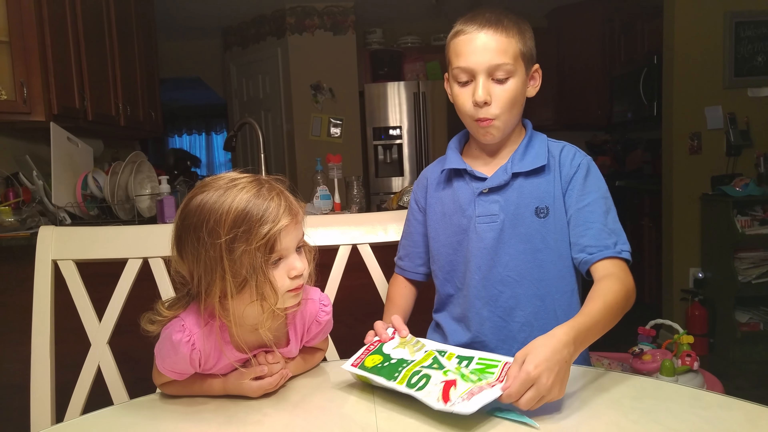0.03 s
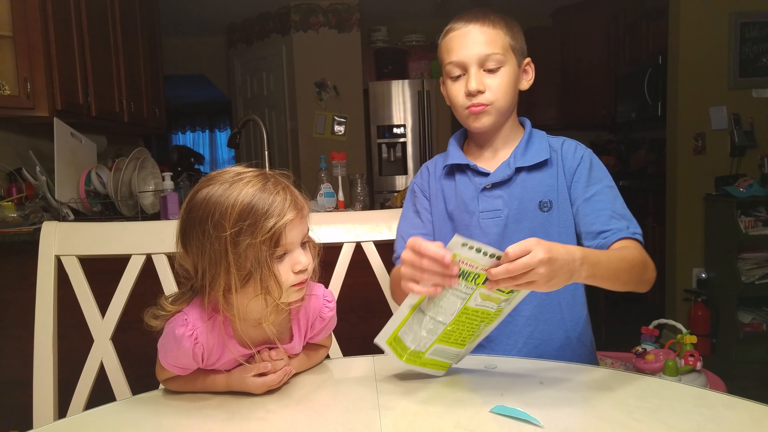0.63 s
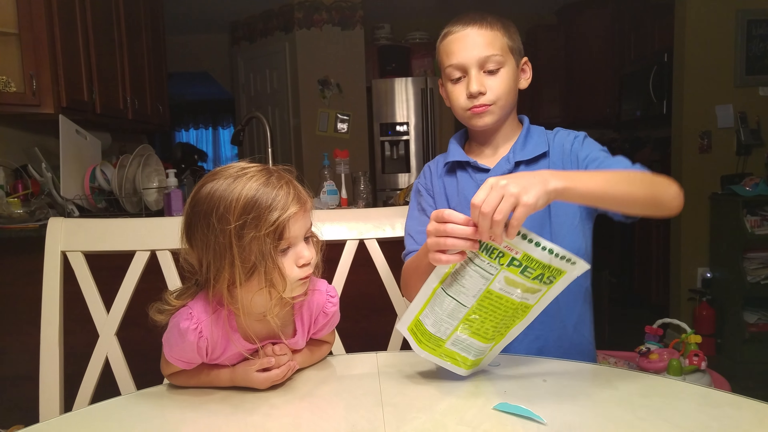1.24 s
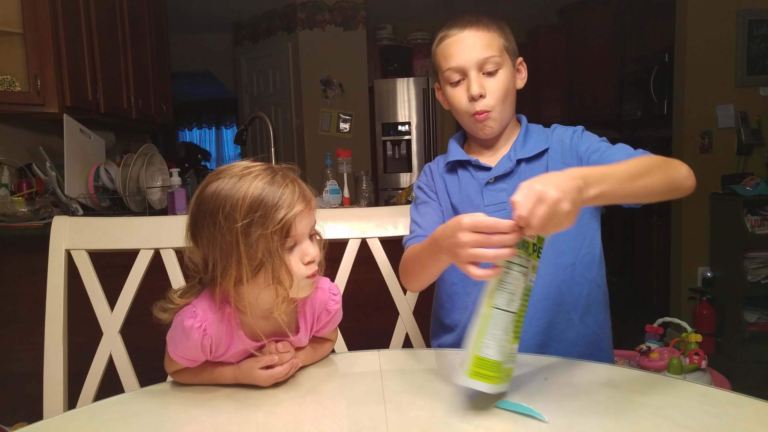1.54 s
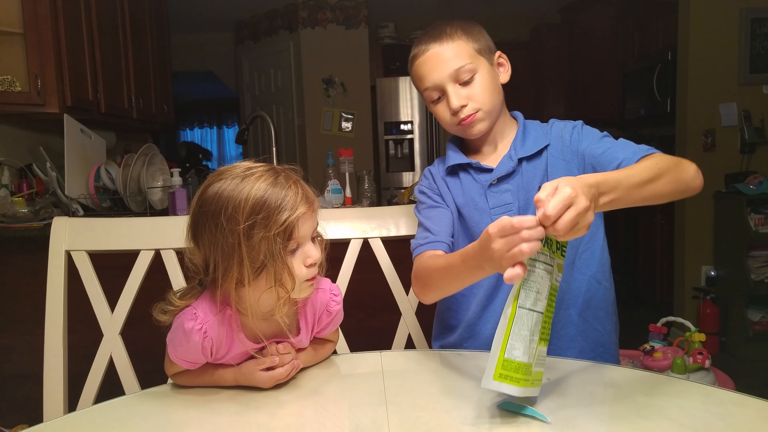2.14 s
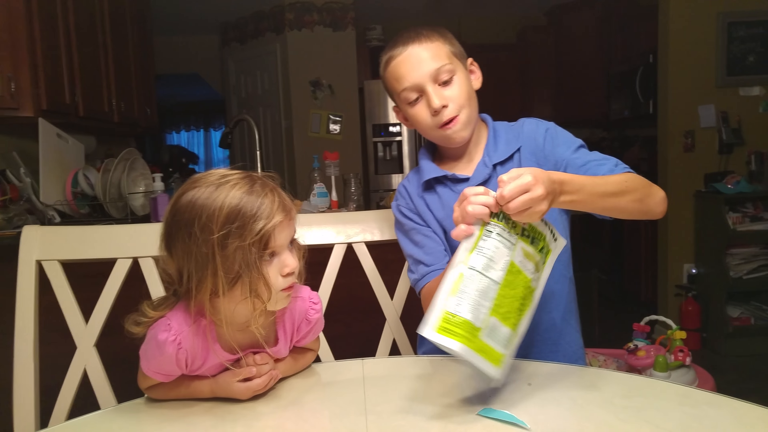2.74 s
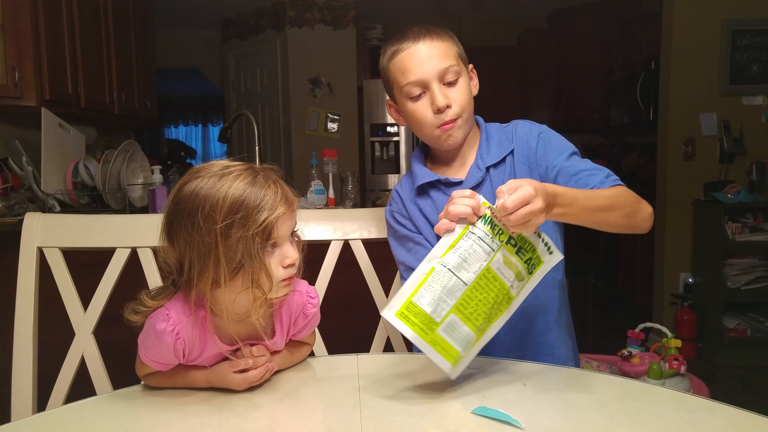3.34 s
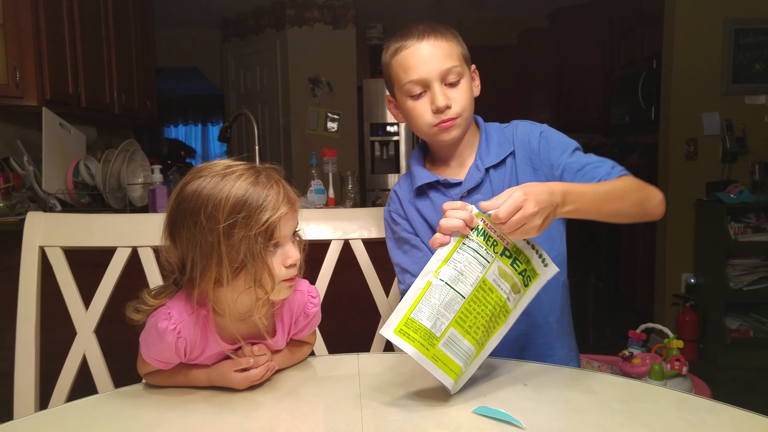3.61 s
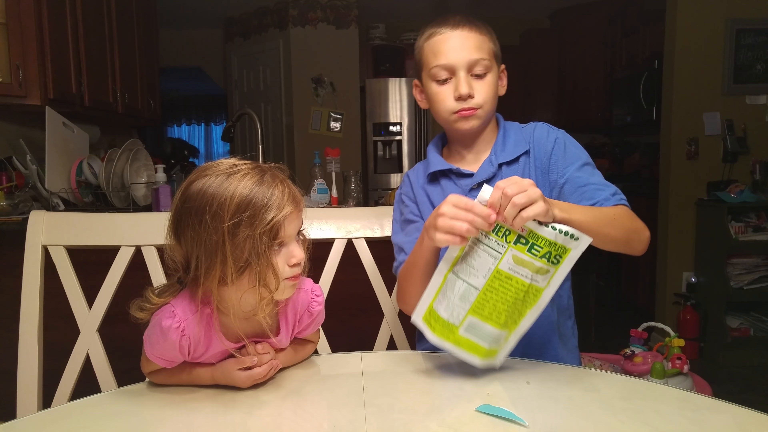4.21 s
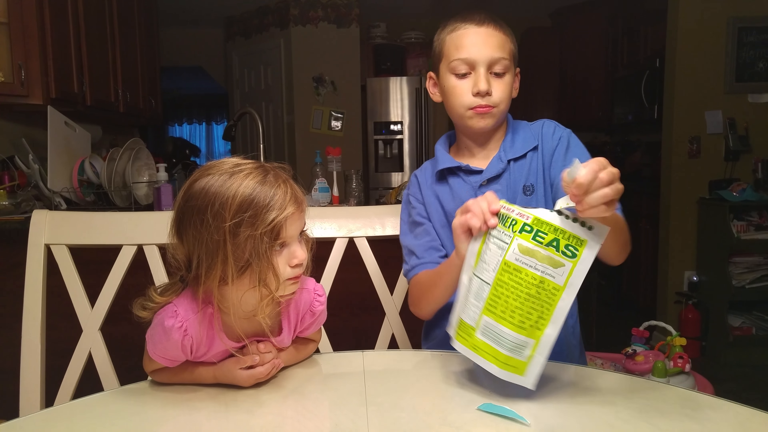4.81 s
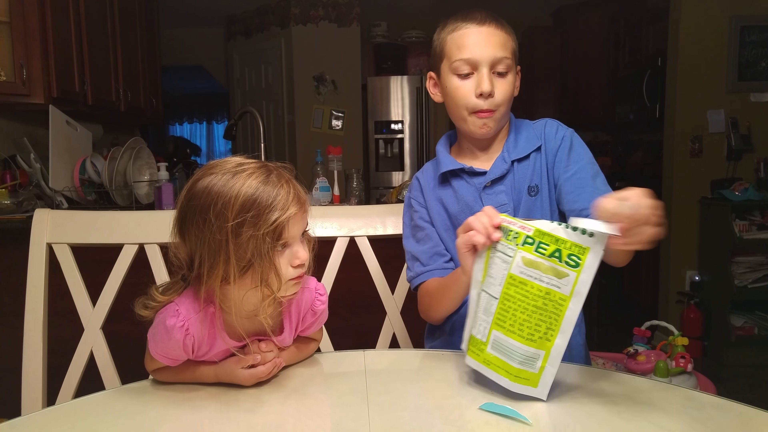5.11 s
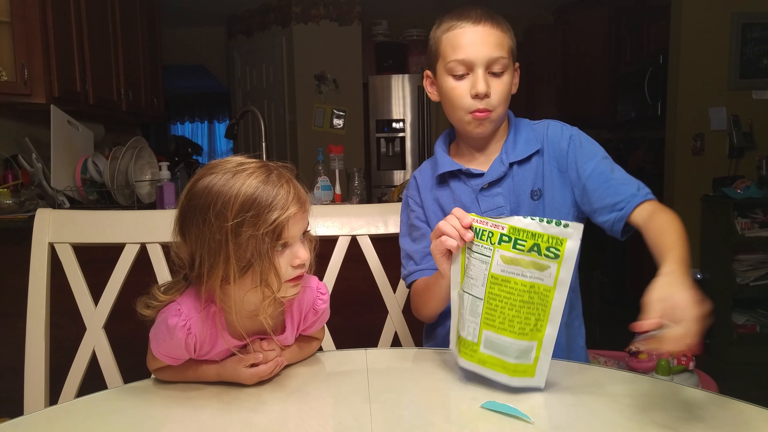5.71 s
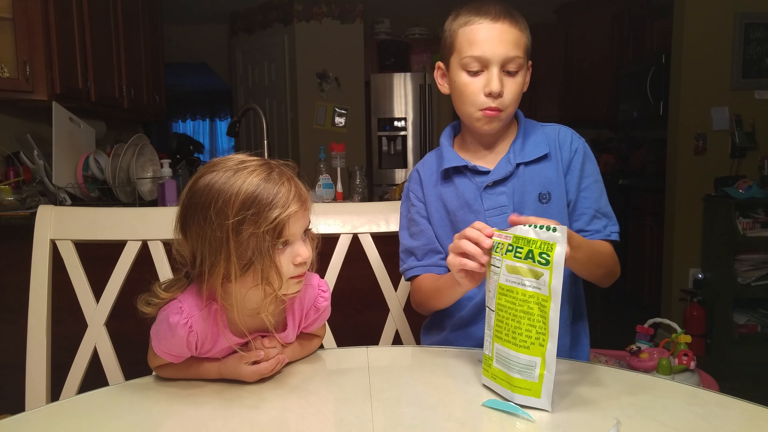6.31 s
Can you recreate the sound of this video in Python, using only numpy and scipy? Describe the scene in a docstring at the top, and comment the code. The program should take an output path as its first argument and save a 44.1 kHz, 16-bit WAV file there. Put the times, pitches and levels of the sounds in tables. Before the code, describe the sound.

A stiff plastic snack pouch crackles in irregular bursts and tears open with a loud snap in a quiet kitchen.

```python
"""Tearing open a snack pouch.

A stiff plastic pouch is lifted off a kitchen table, worried at its seal and torn open. The film buckles
in sharp snaps, each trailing tiny creases, and rustles under every pull. Broad panels pop through and
the table thuds. Table top and kitchen reflect it all, over faint air noise and an appliance hum."""
import sys
import numpy as np
from scipy import signal
from scipy.fft import rfft, irfft
from scipy.io import wavfile
from scipy.ndimage import uniform_filter1d

SR = 44100
rng = np.random.default_rng(int(sys.argv[2]) if len(sys.argv) > 2 else 0)


def generate_wav(sig):
    """Save sig (samples, or channels by samples) to the path in sys.argv[1] as 16-bit PCM at SR."""
    pcm = np.round(np.clip(np.atleast_2d(sig).T, -1, 1) * 32767).astype(np.int16)
    wavfile.write(sys.argv[1], SR, pcm)


N = 288855

# film buckles: start_s, level_db, pitch_hz, bright_db
BUCKLES = [(0.028, -52.5, 1596, -7.5), (0.171, -47, 4250, -5), (0.189, -39, 3750, -19.5),
           (0.325, -42, 1770, -29), (0.548, -41, 1430, -5), (0.646, -52, 3160, -4.5),
           (0.703, -55.5, 3120, -2.5), (0.72, -54, 2920, 6), (0.905, -58.5, 2003, -19),
           (0.924, -44.5, 4867, 0), (1.56, -64.5, 1008, -4.5), (1.718, -48.5, 2725, 0),
           (1.868, -50, 2800, 5), (1.878, -48, 3200, -5.5), (2.035, -54.5, 5070, 0),
           (2.136, -57.5, 2035, -16.5), (2.471, -53.5, 3680, -1), (2.505, -49.5, 2330, -1.5),
           (2.674, -54.5, 2045, -10), (2.866, -57.5, 1437, 3.5), (3.23, -48, 2320, 4.5),
           (3.25, -44, 2100, -10), (3.283, -28.5, 2154, -4.5), (3.361, -33, 2500, 2),
           (3.699, -52.5, 1490, -6.5), (3.858, -59, 1600, -10), (4.011, -55, 2310, -4),
           (4.11, -52, 2180, 1), (4.137, -48.5, 2210, -8), (4.154, -37, 2250, 0), (4.292, -45.5, 2530, -7),
           (4.351, -34, 3480, -4.5), (4.373, -51, 2030, -33), (4.482, -54.5, 2510, 7),
           (4.487, -44, 2850, 5), (4.502, -36.5, 2020, -7), (4.611, -48.5, 4020, 3.5),
           (4.822, -40, 1820, 5), (4.832, -53, 1790, 8.5), (4.864, -31, 2270, 0.5), (4.906, -31, 1870, -4),
           (4.961, -44, 3260, 3), (4.97, -44, 3270, -10), (5.016, -40.5, 2044, -8), (5.107, -47, 2030, -12),
           (5.123, -45.5, 2880, -11.5), (5.243, -47.5, 2330, 7.5), (5.404, -47, 2480, 5),
           (5.516, -47, 2500, 2.5), (5.568, -47, 5070, -3), (5.681, -50.5, 1188, -5.5),
           (6.1, -50.5, 2400, 10), (6.208, -56, 1500, -9), (6.365, -57.5, 2550, -1),
           (6.435, -58.5, 1010, -21)]
# pulls that crease, slide or tear the film: start_s, length_s, level_db, body_db, bright_db
PULLS = [(0.17, 0.052, -40, -18, 1.5), (0.183, 0.028, -22.5, -21, 1.5), (0.216, .07, -42.5, -13.5, -5),
         (0.702, .11, -46.5, -13, -4), (0.919, 0.071, -47, -8, -9), (1.243, 0.085, -55, -16, -3.5),
         (2.253, 0.051, -61, -17.5, -10), (3.228, .035, -39.5, -13.5, -3), (4.272, .035, -50, -28, -8),
         (4.486, .06, -43.5, -14.5, -14), (4.775, 0.053, -51, -11.5, 7.5), (4.829, 0.036, -41, -19, 6.5),
         (4.865, .125, -35.5, -16.5, -1.5), (4.968, 0.11, -48, -18, 5), (5.239, 0.084, -41.5, -10.5, 1.5),
         (5.323, 0.11, -47, -10, -3), (5.528, 0.072, -48.5, -12, -14)]
# creasing under the fingers: time_s, level_db
FINGER_ENVELOPE = [(0, -56), (.45, -58), (1.1, -83), (1.2, -58.5), (1.4, -81.5), (2.8, -71.5),
                   (3.15, -80.5), (3.62, -62.5), (3.8, -68.5), (3.97, -56.5), (4.07, -65.5), (4.7, -69),
                   (5.7, -70.5), (5.87, -58.5), (6.02, -69), (6.5, -58)]
# film colour at the microphone: freq_hz, gain_db
FILM_EQ = [(100, 8), (330, 9.5), (500, 6), (700, 3.5), (1100, -1), (2300, 2), (3000, 3.5), (4200, 11.5),
           (6000, 7.5), (7900, 9.5), (9200, -2), (12000, -10), (15800, -7.5)]
# broad panels popping through: start_s, level_db, pitch_hz
PANEL_POPS = [(0.027, -32, 1610), (.172, -19.5, 1181), (.459, -37, 1510), (.948, -20.5, 2000),
              (.98, -36.5, 860), (1.72, -33, 2530), (2.136, -29, 2120), (2.47, -35.5, 1000),
              (2.507, -30, 965), (2.864, -46, 660), (3.284, -17, 1800), (3.607, -39.5, 2327),
              (3.858, -33.5, 2040), (3.995, -39.5, 2150), (4.093, -29, 1990), (4.621, -31.5, 1020),
              (4.9081, -3.5, 2000), (5.124, -38, 680), (5.8, -38, 2970), (5.881, -32.5, 2010),
              (6.207, -38.5, 810), (6.433, -31.5, 600), (6.459, -40.5, 900)]
# bumps against the table: start_s, level_db
TABLE_BUMPS = [(1.561, -52.5), (2.332, -40), (2.384, -53.5), (2.51, -53.5)]
# table modes: freq_hz, gain_db, t60_s
TABLE_MODES = [(72.4, 0.5, .16), (131, 2.5, .22), (211.7, 2.5, 0.075)]
# echoes off near surfaces: delay_s, gain_db
NEAR_ECHOES = [(.0005, -7), (.0017, -11), (.0075, -13), (.0093, -13), (.0106, -9), (.0120, -14),
               (.0228, -15)]
# kitchen decay: freq_hz, t60_s
ROOM_DECAY = [(150, .42), (500, .44), (1200, .45), (2500, .43), (5000, .40), (8000, .38), (15000, .32)]
# left-right likeness of diffuse sound: freq_hz, correlation
COHERENCE = [(100, .99), (330, .96), (700, .6), (1300, .15), (3000, 0), (15000, 0)]
# stereo tilt: freq_hz, left_minus_right_db
BALANCE = [(250, -.3), (600, -1.8), (1100, -3.8), (2200, -4.4), (4000, -.8), (8000, -2), (13000, -1)]
# still-room noise spectrum: freq_hz, relative_density_db
AIR_SPECTRUM = [(20, -24.5), (32, -11), (50, -7), (100, 8), (160, -4), (310, -9.5), (500, -17),
                (1000, -15.5), (2000, -17), (4000, -22), (8000, -18), (10000, -25), (16000, -34.5)]

MID_SNAP_DB = -45
BAND_LIMIT_HZ = 16150


def snaps(crack_s=.0013, ring_cycles=1.4, ring_db=-6):
    """Each buckle is a click that scatters through the film; the freed panel rings briefly."""
    out, t = np.zeros(N), np.arange(2048) / SR
    for start_s, level_db, pitch_hz, bright_db in BUCKLES:
        softness_db = MID_SNAP_DB - level_db  # soft folds are slower and hollower
        decay_s = crack_s * amp(.43 * softness_db)
        body_db = -25 + .89 * softness_db
        crack = scatter(rng.standard_normal(2 * len(t)), decay_s)
        mode = np.cos(2 * np.pi * pitch_hz * t) * np.exp(-t * pitch_hz / ring_cycles)
        ring = signal.fftconvolve(crack, mode)[:len(t)]
        panel = unit(crack) + amp(ring_db) * unit(ring)
        panel = band(panel, .31 * pitch_hz, BAND_LIMIT_HZ, order=1)  # radiates little far below pitch
        add(out, start_s, amp(level_db) * pouch(crack, panel, body_db, bright_db, top_hz=12500))
    return out


def rustles(attack_s=.001, release_s=.0035, sag_db=6.5):
    """Each pull sets off a dense run of creases that bites fast and eases as the film gives."""
    out = np.zeros(N)
    for start_s, length_s, level_db, body_db, bright_db in PULLS:
        t = np.arange(max(round(length_s * SR), 512)) / SR
        crack, panel = creasing(len(t), base_per_s=380)
        run = pouch(crack, panel, body_db, bright_db, top_hz=17000)
        edges = np.minimum(t / attack_s, 1) * np.minimum((t[-1] - t) / release_s, 1)
        add(out, start_s, run * edges * amp(level_db - sag_db * t / t[-1]))
    return out


def settling(trail_db=-46, trail_t60_s=.09, rub_db=-5):
    """Sparse creases: some under the rubbing fingers, plus a dying flurry after each snap."""
    t, kicks = np.arange(N) / SR, np.zeros(N)
    for start_s, level_db, _, _ in BUCKLES:
        add(kicks, start_s, amp([trail_db + .75 * (level_db - MID_SNAP_DB)]))
    trail_gain = signal.lfilter([1], [1, -amp(-60 / (trail_t60_s * SR))], kicks + 1e-12)
    finger_gain = amp(np.interp(t, *np.transpose(FINGER_ENVELOPE)))
    crack, panel = creasing(N, base_per_s=260)
    handling = pouch(crack, panel, body_db=-12, bright_db=-8, top_hz=15000)
    rub = amp(rub_db) * unit(band(crack, 380, 800))
    flurry = pouch(crack, panel, body_db=-25, bright_db=-3, top_hz=15000)
    return finger_gain * (handling + rub) + trail_gain * flurry


def creasing(n, base_per_s, facet_db=-2, spread_db=4.5, hiss_gain=.22):
    """Clumps of tiny unequal creases over the hiss of sliding film; each rings a small facet."""
    span = max(n, SR)
    chance, size_draw, facet_draw = rng.random((3, span))[:, :n]
    slip = unit(uniform_filter1d(rng.standard_normal(span), 300))[:n]  # grip holds and gives
    rate_per_s = base_per_s * amp(5 * slip)
    sizes = amp(spread_db * np.minimum(-np.log(size_draw + 1e-9), 3))
    creases = sizes * (chance < rate_per_s / SR) * rng.choice([-1, 1], span)[:n]
    crack = unit(creases) + hiss_gain * rng.standard_normal(span)[:n]
    facets_hz = np.geomspace(900, 3600, num=8)
    facet = np.floor(facet_draw * len(facets_hz))
    rings = sum(band(creases * (facet == k), hz / 1.15, hz * 1.15, order=1)
                for k, hz in enumerate(facets_hz))
    return crack, unit(crack) + amp(facet_db) * unit(rings)


def pouch(crack, panel, body_db, bright_db, top_hz):
    """A fold radiates three ways: enclosed air, flexing panel, sharp crease."""
    body = unit(band(crack, 140, 330))
    middle = unit(band(panel, 643, 2880))
    top = unit(band(crack, 5600, top_hz))
    return amp(body_db) * body + middle + amp(bright_db) * top


def pops(t60_cycles=15):
    """A broad panel pops through and rings in one hollow mode."""
    out = np.zeros(N)
    for start_s, level_db, pitch_hz in PANEL_POPS:
        add(out, start_s, knock(level_db, pitch_hz, t60_cycles / pitch_hz))
    return out


def thuds():
    """Each bump excites the table's low modes."""
    out = np.zeros(N)
    for start_s, level_db in TABLE_BUMPS:
        modes = [knock(level_db + gain_db, hz, t60_s) for hz, gain_db, t60_s in TABLE_MODES]
        add(out, start_s, sum(modes))
    return out


def knock(level_db, hz, t60_s):
    """One damped mode with a soft onset of about a cycle."""
    t = np.arange(SR // 2) / SR
    return amp(level_db - 60 * t / t60_s) * (1 - np.exp(-t * hz)) * np.sin(2 * np.pi * hz * t)


def moving_paths(x, count=3, cycle_hz=2.3):
    """The pouch keeps moving: its room paths crossfade from one set to the next."""
    phase = 2 * np.pi * np.arange(N) / SR * cycle_hz
    weights = np.array([np.maximum(np.cos(phase - 2 * np.pi * k / count), 0) ** 2 for k in range(count)])
    return sum(kitchen(x * weight) for weight in weights / weights.sum(0))


def kitchen(x, tail_db=-1.5, build_s=.003, left_lag_samples=3):
    """Direct sound, echoes off hands, table and near surfaces, then the diffuse tail."""
    t = np.arange(SR * 3 // 4) / SR
    hz, frame_s, spectra = signal.stft(diffuse_noise(len(t)), SR, nperseg=256)
    decay = amp(-60 * frame_s / lookup(ROOM_DECAY, hz)[:, None])
    tail = signal.istft(spectra * decay, SR, nperseg=256)[1][:, :len(t)]
    tail *= 1 - np.exp(-t / build_s)
    response = amp(tail_db) * tail / np.linalg.norm(tail[0])
    for delay_s, gain_db in NEAR_ECHOES:
        echoes = scatter(diffuse_noise(1024), decay_s=.0008)
        for side, echo in zip(response, echoes):
            add(side, delay_s, amp(gain_db) * echo)
    response[0, left_lag_samples] += .7  # pouch right of centre: left is later and weaker
    response[1, 0] += 1
    return signal.fftconvolve(x[None], response, axes=1)[:, :N]


def room_air(level_db=-61):
    """Faint steady noise of the still room."""
    hz = np.fft.rfftfreq(N, 1 / SR)
    air = irfft(rfft(diffuse_noise(N)) * amp(lookup(AIR_SPECTRUM, hz)), N)
    return amp(level_db) * air / np.std(band(air[0], 80, 16000))


def appliance_hum(pitch_hz=49.6, level_db=-54.5, waver_rad=.2, drift_hz=4):
    """A low tone wavering in phase and level."""
    hz = np.fft.rfftfreq(N, 1 / SR)
    lowpass = np.exp(-(hz / drift_hz) ** 2)
    phase_drift, drift_db = unit(irfft(rfft(rng.standard_normal((2, N))) * lowpass, N))
    phase = 2 * np.pi * pitch_hz * np.arange(N) / SR + waver_rad * phase_drift
    return amp(level_db) * unit(np.sin(phase) * amp(drift_db))


def suppress(x, depth_db=9, range_db=22):
    """Noise suppressor: turns down what lies near the steady floor, shortening quiet tails."""
    spectra = signal.stft(x, SR, nperseg=512)[2]
    power = (abs(spectra) ** 2).mean(0)
    power = uniform_filter1d(uniform_filter1d(power, 15, axis=0), 3, axis=1)
    level_db = 10 * np.log10(abs(power) + 1e-20)
    excess_db = level_db - np.percentile(level_db, 15, axis=1, keepdims=True)
    gain = amp(-depth_db * np.clip(1 - excess_db / range_db, 0, 1))
    return signal.istft(spectra * gain, SR, nperseg=512)[1][:, :N]


def scatter(noise, decay_s):
    """A click smeared by many short paths: flat spectrum, unit energy."""
    size = noise.shape[-1]
    spectrum = rfft(noise * np.exp(-np.arange(size) / SR / decay_s))
    burst = irfft(spectrum / (abs(spectrum) + 1e-9), size)[..., :size // 2]
    return burst / np.linalg.norm(burst, axis=-1, keepdims=True)


def diffuse_noise(n):
    """Stereo noise, alike in the bass as at two close ports."""
    left, other = rfft(rng.standard_normal((2, n)))
    correlation = lookup(COHERENCE, np.fft.rfftfreq(n, 1 / SR))
    right = correlation * left + np.sqrt(1 - correlation ** 2) * other
    return irfft([left, right], n)


def colour(x, curve, power=1, size=4096):
    """Minimum-phase EQ: clicks keep their sharp front."""
    log_gain = power * np.log(amp(lookup(curve, abs(np.fft.fftfreq(size, 1 / SR)))))
    taps = np.fft.ifft(np.exp(np.conj(signal.hilbert(log_gain)))).real
    return signal.oaconvolve(x, taps[:size // 2])[:len(x)]


def band(x, lo_hz, hi_hz, order=2):
    """Causal band-pass."""
    return signal.sosfilt(signal.butter(order, [lo_hz, hi_hz], "band", fs=SR, output="sos"), x)


def lookup(curve, hz):
    """Interpolates on a log-frequency axis."""
    knots_hz, values = np.transpose(curve)
    return np.interp(np.log(hz + 1), np.log(knots_hz + 1), values)


def add(mix, start_s, sound):
    """Mixes in place."""
    part = mix[round(start_s * SR):][:len(sound)]
    part += sound[:len(part)]


def amp(db):
    """Decibels to gain."""
    return 10 ** (np.asarray(db) / 20)


def unit(x):
    """Scales to unit rms."""
    return x / np.sqrt(np.mean(x ** 2) + 1e-20)


def scene():
    """The pouch in the kitchen, in stereo."""
    film = colour(snaps() + rustles() + settling(), FILM_EQ)
    left, right = moving_paths(film + pops() + thuds())
    pair = np.array([colour(left, BALANCE, power=.5), colour(right, BALANCE, power=-.5)])
    return pair + room_air() + appliance_hum()


def record(dry):
    """Noise suppression, the microphone's low-mid dip, soft overload, band limit."""
    quiet = suppress(dry)
    notched = signal.lfilter(*signal.iirnotch(490, Q=3, fs=SR), quiet)
    clipped = np.tanh(.15 * quiet + .85 * notched)
    lowpass = signal.firwin(511, BAND_LIMIT_HZ, window=("kaiser", 9), fs=SR)
    return signal.oaconvolve(clipped, lowpass[None], "same")


dry = scene()
out = record(dry)
generate_wav(out)
```